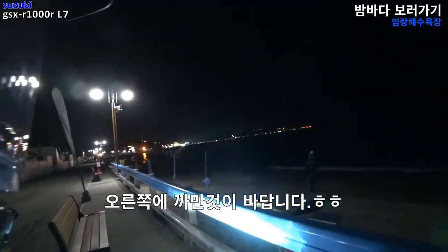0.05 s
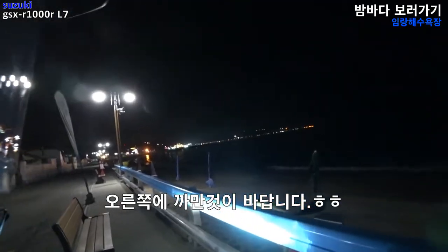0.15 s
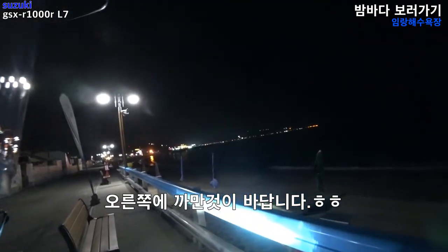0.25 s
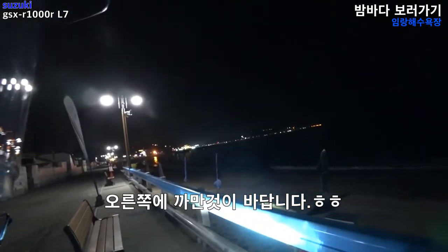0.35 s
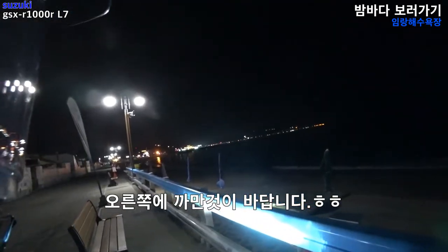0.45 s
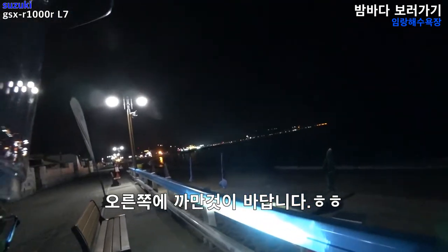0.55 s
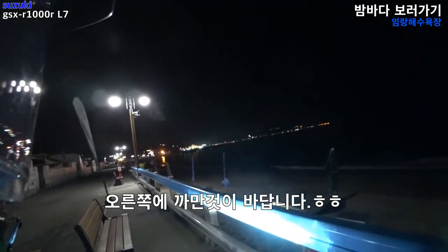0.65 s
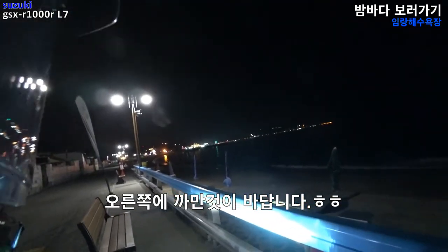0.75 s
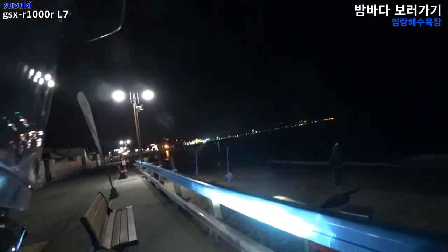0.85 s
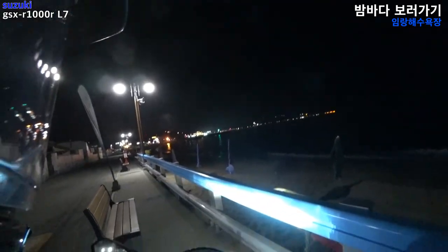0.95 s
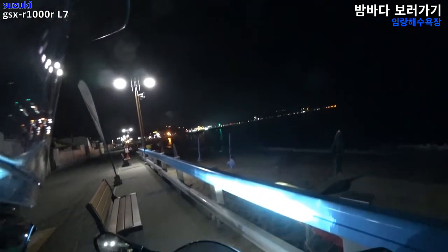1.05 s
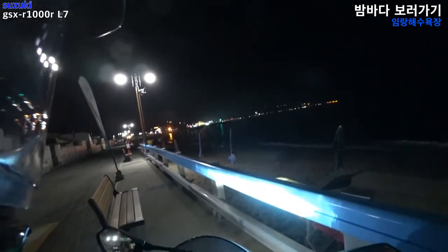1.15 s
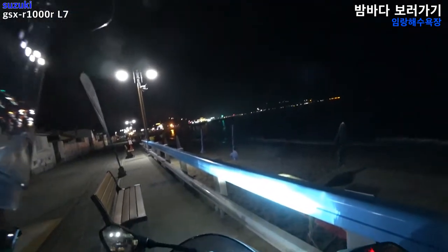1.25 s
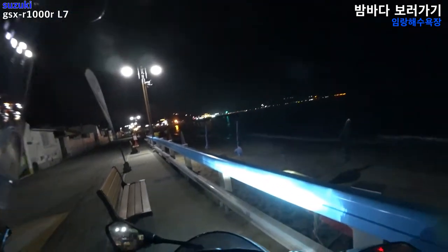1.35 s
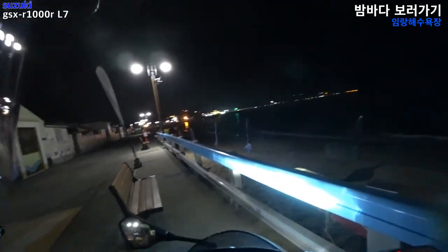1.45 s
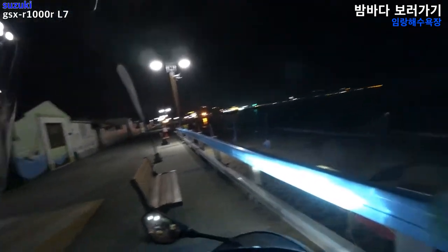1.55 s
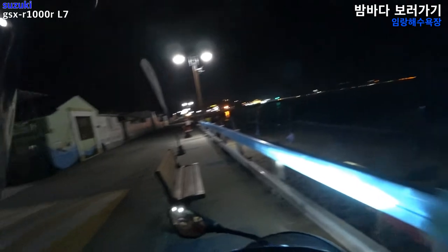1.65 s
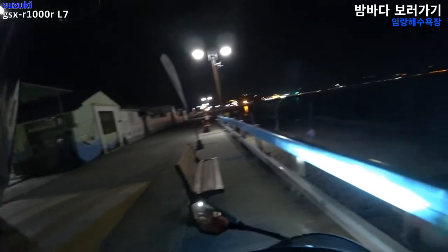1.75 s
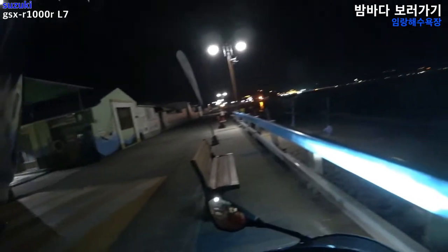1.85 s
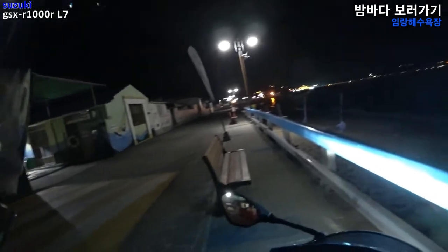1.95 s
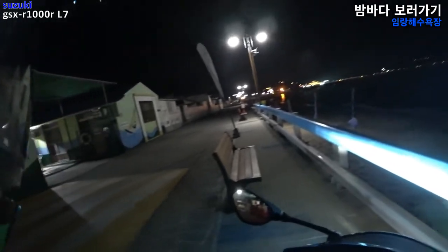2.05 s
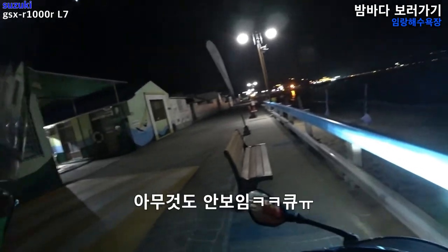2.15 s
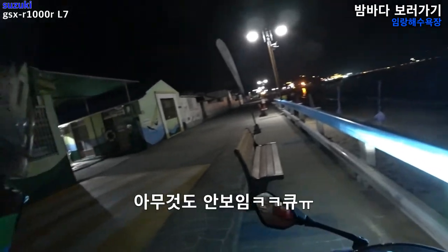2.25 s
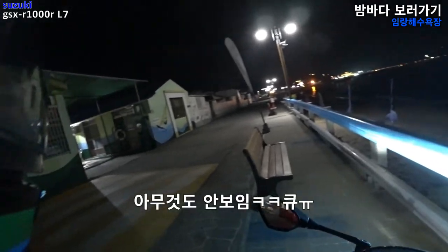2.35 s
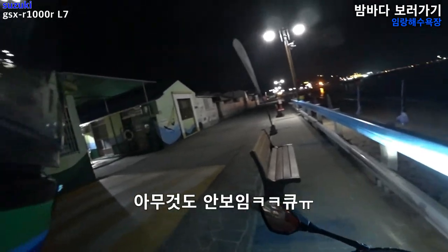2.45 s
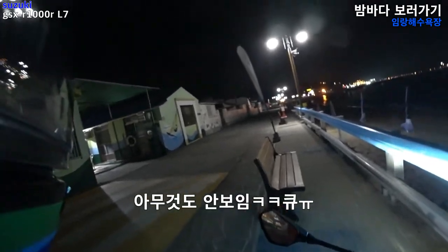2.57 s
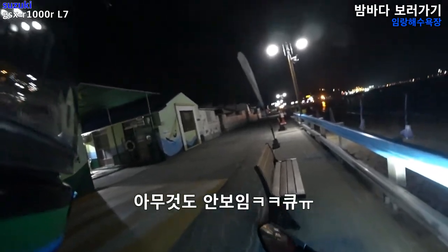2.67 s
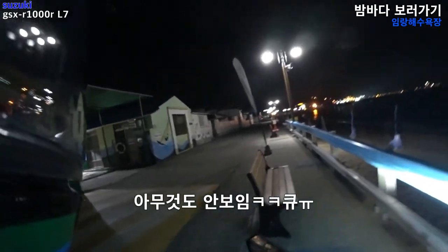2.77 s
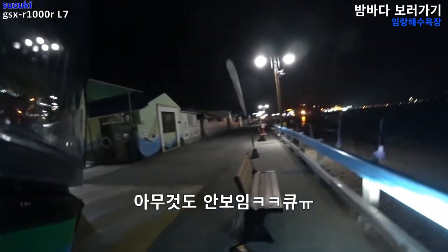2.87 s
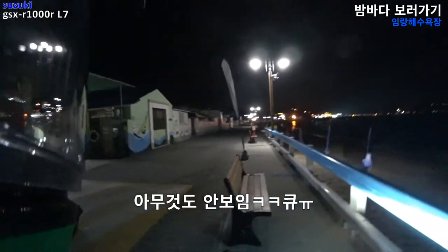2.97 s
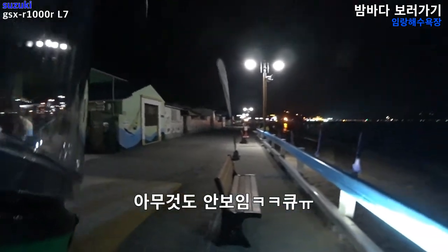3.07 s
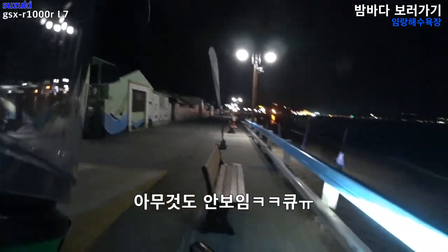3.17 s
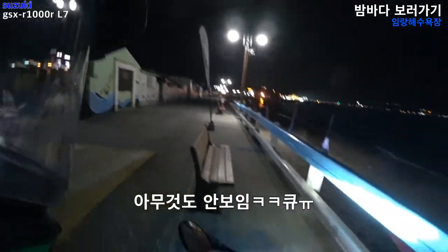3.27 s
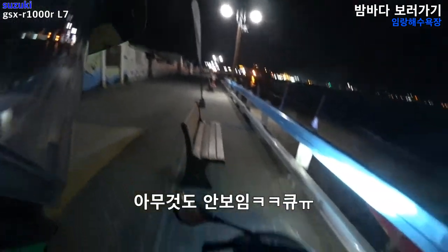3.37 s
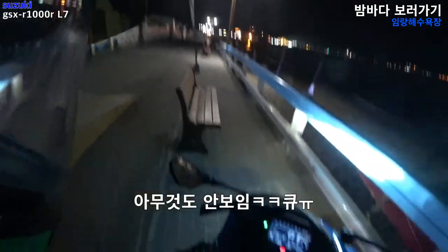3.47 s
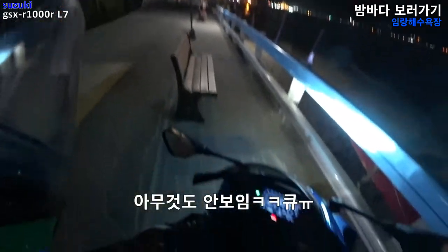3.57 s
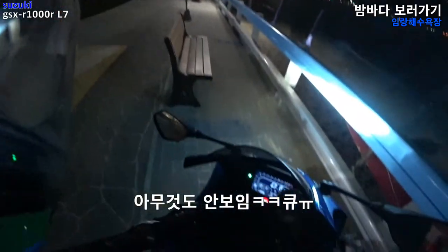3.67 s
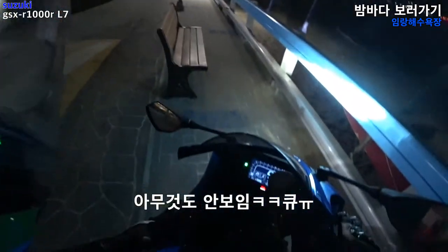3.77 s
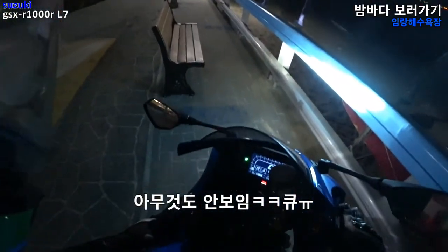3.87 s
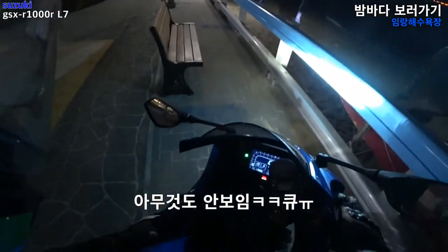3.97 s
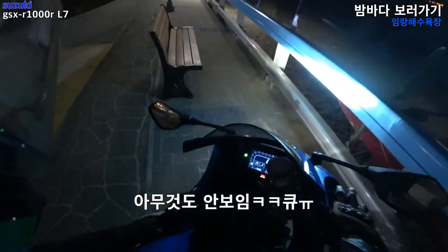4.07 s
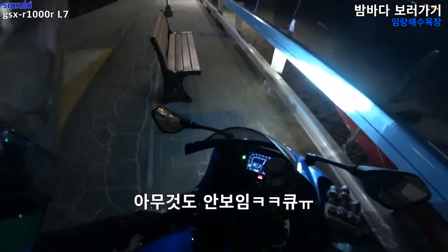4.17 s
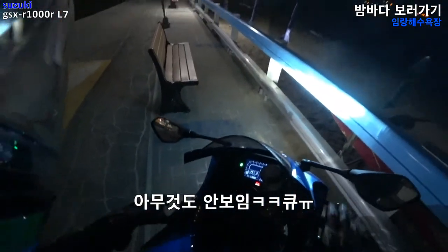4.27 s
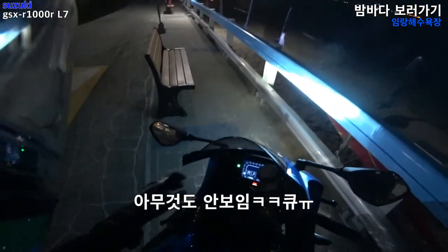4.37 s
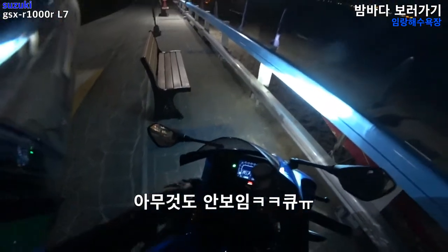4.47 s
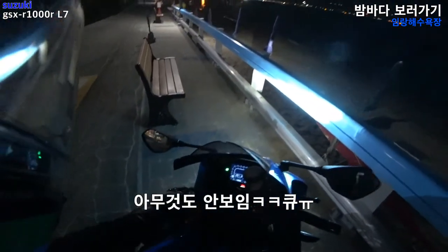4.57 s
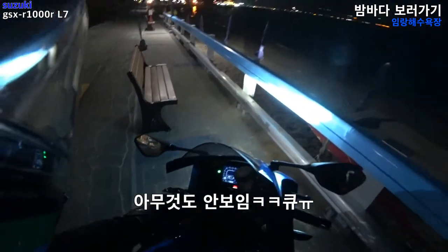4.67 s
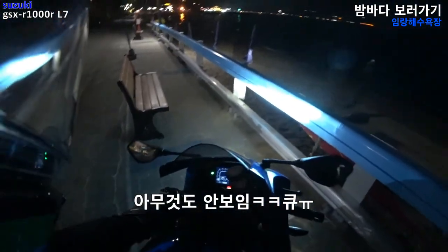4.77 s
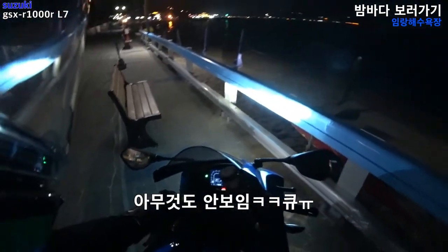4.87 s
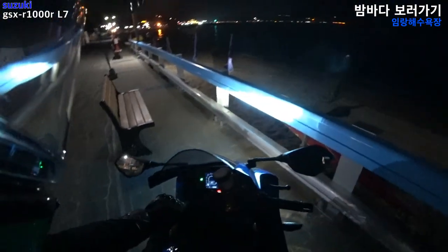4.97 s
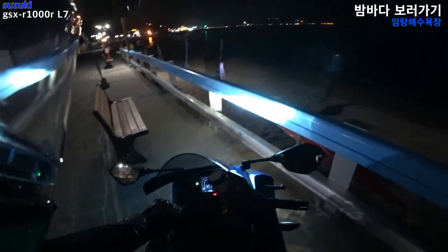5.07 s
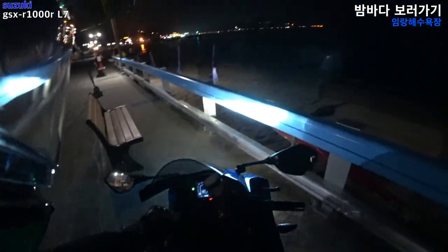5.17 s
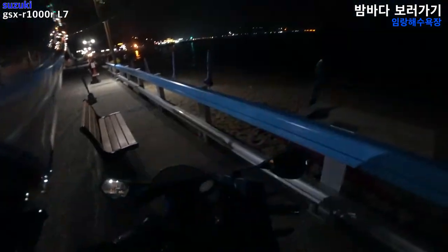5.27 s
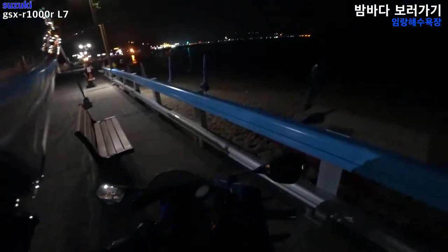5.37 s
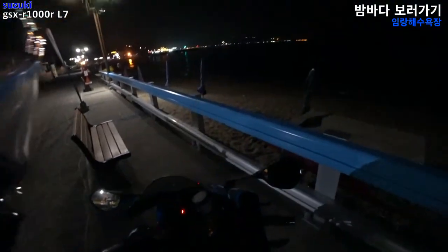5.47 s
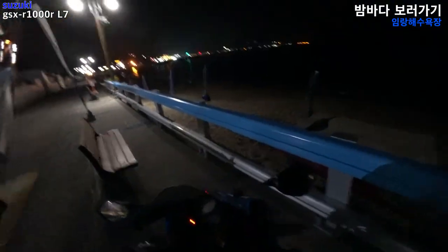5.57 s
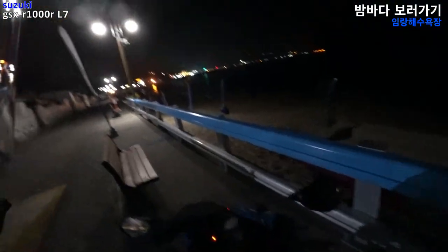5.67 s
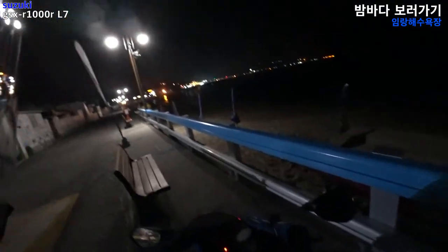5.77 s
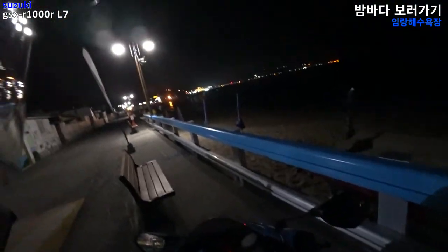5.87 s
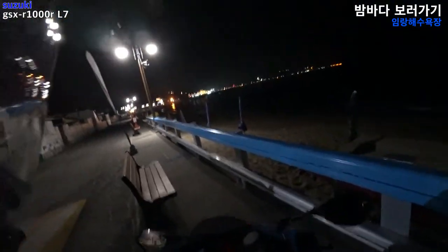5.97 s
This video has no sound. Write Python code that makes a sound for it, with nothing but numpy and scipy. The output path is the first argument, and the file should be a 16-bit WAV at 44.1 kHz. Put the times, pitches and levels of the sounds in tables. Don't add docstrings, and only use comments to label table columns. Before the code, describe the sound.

A motorcycle is already idling at 0 s, heard close from a helmet on an open seafront. Some forty soft, deep exhaust barks per second merge into a throbbing, boomy purr that wavers slightly, stumbling notably around 1.4 s. Low gas flutter, valve rattle, thin gear whine and faint casing knocks sit around it, with a light fan hiss that stops at about 1 s. Harder firings crack through near 1.1, 2.3, 2.8 and 4.4 s. As the head turns from about 3 s, the bark becomes edgier and more ringing; between 4.9 and 5.3 s the firings hit harder. At roughly 5.3 s the engine is switched off: four slowing gulps and thuds, then clacks around 5.5 s. Automatic gain rises, lifting hollow, rumbling surf wash, with low bumps at 5.6-5.7 s and a dull knock near 5.9 s.

```python
import sys
import numpy as np
from scipy import signal
from scipy.fft import rfft, irfft
from scipy.io import wavfile
from scipy.ndimage import uniform_filter1d

SR = 44100
rng = np.random.default_rng(int(sys.argv[2]) if len(sys.argv) > 2 else 0)


def put_to_file(sound):
    columns = np.atleast_2d(sound).T
    safe = np.clip(columns, -1, 1)
    whole_steps = np.round(safe * 32767)
    wavfile.write(sys.argv[1], SR, whole_steps.astype(np.int16))


def level_to_linear(level):
    exponent = np.asarray(level, float) / 20
    return 10 ** exponent


N = 265923
T = np.arange(N) / SR
HZ = np.arange(N // 2 + 1) * SR / N + 1e-3

IDLE_HZ, FIRST_TURN = 42.31, 0.8718
# t/s, change of firing rate f/Hz, half length t/s
STUMBLES = [(0.111, -2.57, 0.066), (0.424, 1.52, 0.074), (0.541, -2.14, 0.131), (0.716, 1.64, 0.043),
            (0.92, -0.91, 0.126), (1.216, -1.78, 0.037), (1.371, -4.82, 0.063), (1.507, 1.01, 0.025),
            (1.734, -1.18, 0.07), (2.023, -2.35, 0.046), (2.167, -2.81, 0.046), (2.54, -2.98, 0.062),
            (2.91, -1.8, 0.042), (3.078, -2.81, 0.054), (3.288, -1.3, 0.068), (3.611, -1.17, 0.061),
            (3.766, -2.23, 0.034), (3.951, -2.72, 0.061), (4.431, 3.72, 0.05), (4.449, -2.17, 0.196),
            (4.88, -2.63, 0.177), (4.952, 3.08, 0.061), (5.092, -1.79, 0.025), (5.199, 1.16, 0.042)]
CYLINDER_LATE_TURNS = [0, .003, .009, .012]
CYLINDER_DB = [0.049, -0.71, -0.46, .4]
# t/s, bark level/dB, silencer ring level/dB, edge level/dB
HEAD = [(0, -0.1, 1.6, -8), (.9, -0.2, 1.3, -4.5), (1.2, 0.4, 1.5, -6.3), (2.0, -0.5, 1, -1.1),
        (2.6, 0.2, 2, -2), (3.2, -2, 5.5, 0.6), (3.7, -2.5, -0.5, 3.5), (4.5, -1.95, 6, 1.2),
        (4.85, -0.4, 6.5, -1.5), (5.0, -0.7, 7, -1.5), (5.2, 0.9, 5.5, -3), (5.32, 0.1, 7, -2.5)]
BARK_DB_PER_HZ, CAN_DB_PER_HZ, BOOM_DB_PER_HZ, EDGE_DB_PER_HZ = -0.02, 0.5, -0.1, 1
PUSH_HZ, PUSH_LEAD_S = 200, 5.5e-4
SILENCER_HZ, SILENCER_Q, VENT_HZ = 360, 1.3, 130
TRAP_HZ, TRAP_Q, TRAP_SHARE = 164, 2.4, 0.34
CAN_HZ, CAN_Q, CAN_PER_DB = 231, 5.3, 0.1471
EDGE_HZ, EDGE_Q = 367, 1.1
BOX_HZ, BOX_Q, BOOM_DB = 41.6, 5.0, 0
# t/s, suction level/dB, boom level/dB
COAST = [
    (5.347, -9, 3),
    (5.374, -4.5, -17),
    (5.41, -4.5, 4),
    (5.454, -6, 0),
]
# f/Hz, level/dB per Hz
RATTLE_TONE = [(250, -18), (420, -4.5), (482, 1), (545, -9), (822, -21), (969, -15.5), (1220, -21.5),
               (1700, -21), (1900, -32.5), (2780, -26.5), (3230, -36), (3710, -33.5), (7880, -50),
               (10500, -38.5), (11100, -45), (14400, -85), (22000, -120)]
RATTLE_DB, FLUTTER_DB = -38.5, -28
# f/Hz, level/dB rms
WHINE = [(552, -66.5), (2148, -79), (2558, -71.5)]
# t/s, level/dB
CASING_LEVEL = [(0, -46), (.9, -45), (1.5, -46.5), (1.7, -60.5), (3.4, -50.5), (3.6, -67.5), (5.3, -47.5),
                (5.6, -60.5)]
# f/Hz, Q, level/dB
CASING_MODES = [(495, 4, -1.5), (744, 11, 1.5), (986, 6.8, 3.5), (1423, 5.4, -3), (1625, 16, 1),
                (2460, 24, -23), (3710, 16, -26)]
# f/Hz, level/dB per Hz
FAN_TONE = [(1500, -22.5), (2600, -7), (4000, -13), (6500, 1), (8500, -2), (11000, -1.5)]
FAN_DB, FAN_OFF_S, FAN_FADE_DB_PER_S = -56, 1.01, 169
# f/Hz, level/dB per Hz
SURF_TONE = [(18, -46.5), (35, -17.5), (70, 1.5), (95, -8.5), (161, 0.5), (202, -4.5), (265, 0.5),
             (516, -7), (600, -8.5), (660, -12.5), (1290, -21), (2500, -24), (4340, -38), (6280, -35),
             (11100, -41.5)]
# f/Hz, Q, level/dB
HELMET = [(340, 3.4, -17), (492, 14, -5.5), (583, 26, -3), (1576, 3.8, -5)]
SURF_DB, RECOVER_DB_PER_S, RELEASE_S = -39, 50, 5.337
PAUSE_S, PAUSE_LENGTH_S, CEILING_DB = 5.548, 0.12, -17
# t/s, peak level/dB, half length t/s
HARD_FIRINGS = [(0.153, -35, .009), (0.728, -40.5, .009), (1.063, -26, .009), (2.18, -37, 0.01),
                (2.303, -20.5, .009), (2.781, -22, 0.011), (3.73, -32, .009), (3.922, -36, .009),
                (4.428, -21, 0.011), (4.919, -22.5, .03), (5.002, -19.5, 0.05), (5.18, -19.5, .04),
                (5.266, -21.5, 0.07)]
CRACK_HZ, CRACK_Q = 588, 1.4
# t/s, peak level/dB, length t/s, centre f/Hz, spread factor
CLACKS = [(5.483, -28, 0.016, 2600, 3.2), (5.484, -24.5, 0.016, 1400, 1.6), (5.56, -26.5, 0.051, 35, 1.4),
          (5.63, -28, 0.078, 45, 1.9), (5.72, -22.5, 0.13, 68, 1.3), (5.923, -16.5, 0.037, 520, 1.2),
          (5.499, -14, 0.0029, 250, 0.93), (5.512, -19.5, 0.065, 280, 1.4), (5.52, -34.5, 0.06, 1500, 0.96),
          (5.343, -43.5, .002, 5000, 2.5), (2.74, -40.5, 0.006, 7200, 1.2), (2.8, -46, 0.0073, 3400, 1.1),
          (3.43, -47.5, 0.012, 5000, 0.79)]
# f/Hz, correlation
LIKENESS = [(60, 1.0), (130, 0.96), (270, 1.0), (570, 0.96), (1210, 0.93), (2560, -0.59), (5420, -0.44),
            (11500, 0.28)]
# f/Hz, left minus right level/dB
LEAN = [(60, .7), (190, .9), (350, 1.1), (620, 2.2), (1110, 4.3), (1990, 5), (3570, -.3), (6410, -1),
        (11500, -6.5)]
PORT_LAG_S, KNEE, HEADROOM, TOP_HZ = 6e-5, 0.78, 0.17, 11100


def level(x, db):
    return x * level_to_linear(db) / np.sqrt(np.mean(x ** 2))


def curve(table, column=1):
    return np.interp(T, np.array(table)[:, 0], np.array(table)[:, column])


def on_log(table, hz):
    return np.interp(np.log(hz), np.log(np.array(table)[:, 0]), np.array(table)[:, 1])


def hump(s, half_s):
    return np.exp(-((T - s) / half_s) ** 2)


def ring(hz, q):
    return 1 / (1 - (HZ / hz) ** 2 + 1j * HZ / hz / q)


def band(hz, q):
    return ring(hz, q) * 1j * HZ / hz / q


def low_cut(hz):
    return HZ ** 2 / (HZ ** 2 + hz ** 2)


def walk(rate):
    k = int(SR / rate)
    held = np.repeat(rng.standard_normal(N // k + 1), k)
    return 0.74 * uniform_filter1d(uniform_filter1d(held, k), k)[:N]


def diffuse(tone, flicker_db, rate):
    like = np.clip(on_log(LIKENESS, HZ), -0.9, 0.999)
    colour = level_to_linear(on_log(tone, HZ))
    mid = rfft(rng.standard_normal(N)) * colour * np.sqrt(1 + like)
    side = rfft(rng.standard_normal(N)) * colour * np.sqrt(1 - like)
    ports = np.array([mid + side, mid - side])
    out = 0
    for place in np.arange(9, 28):
        slot = np.cos(np.clip(2 * np.log2(HZ) - place, -1, 1) * np.pi / 2) ** 2
        out = out + level_to_linear(flicker_db * walk(rate)) * irfft(slot * ports, N)
    return level(out, 0)


def strokes(times, sizes):
    train = np.zeros(N)
    np.add.at(train, (np.asarray(times) * SR).astype(int), sizes)
    return rfft(train)


def crank():
    surge_hz = sum(hz * hump(s, half_s) for s, hz, half_s in STUMBLES)
    turns = np.cumsum(IDLE_HZ + surge_hz) / SR - FIRST_TURN
    firing_points = np.arange(221) + np.resize(CYLINDER_LATE_TURNS, 221)
    fired = np.interp(firing_points, turns, T)
    return turns, fired, np.interp(fired, T, surge_hz)


def exhaust_bark(fired, surge):
    bark_db, can_db, edge_db = (curve(HEAD, column=k)[(fired * SR).astype(int)] for k in (1, 2, 3))
    late, loud, ringing = rng.standard_normal((3, len(fired)))
    bark_db = bark_db + BARK_DB_PER_HZ * surge + np.resize(CYLINDER_DB, len(fired))
    can_db = can_db + CAN_DB_PER_HZ * surge
    edge_db = edge_db + EDGE_DB_PER_HZ * surge
    size = level_to_linear(bark_db + 0.32 * loud)
    at = fired + 0.00014 * late
    barks = strokes(at, size) + strokes(at, size * (level_to_linear(edge_db) - 1)) * band(EDGE_HZ, EDGE_Q)
    rings = strokes(at, size * CAN_PER_DB * (can_db + 0.27 * ringing)) * band(CAN_HZ, CAN_Q)
    push = np.exp(-(HZ / PUSH_HZ) ** 2 + 2j * np.pi * HZ * PUSH_LEAD_S)
    pipe = ring(SILENCER_HZ, SILENCER_Q) * low_cut(VENT_HZ) - TRAP_SHARE * band(TRAP_HZ, TRAP_Q)
    return irfft((barks + rings) * push * pipe, N) * level_to_linear(48.0)


def air_box_boom(fired, surge):
    coast_s, _, thud_db = np.transpose(COAST)
    boom_db = BOOM_DB + BOOM_DB_PER_HZ * surge + 0.5 * rng.standard_normal(len(fired))
    booms = strokes(fired, level_to_linear(boom_db)) + strokes(coast_s, level_to_linear(thud_db))
    booms = booms + level_to_linear(6.5)
    box = ring(BOX_HZ, BOX_Q) * np.exp(-(HZ / 120) ** 2) * low_cut(24.0)
    return -irfft(booms * box, N) * level_to_linear(30.5)


def gas_flutter(turns):
    tone = ring(331.0, 1.0) ** 2 * np.exp(-(HZ / 330) ** 4) * low_cut(45)
    noise = irfft(rfft(rng.standard_normal(N)) * tone, N)
    return level(noise * level_to_linear(1.8 * np.cos(2 * np.pi * (turns - 0.12))), FLUTTER_DB)


def valve_rattle(turns):
    beat = level_to_linear(2.7 * np.cos(2 * np.pi * (turns - 0.08)) + 0.63 * np.cos(6 * np.pi * turns))
    return diffuse(RATTLE_TONE, flicker_db=-0.5, rate=22.0) * beat * level_to_linear(RATTLE_DB)


def gear_whine():
    wander = np.cumsum(1 + 0.003 * walk(6.0)) / SR
    return sum(np.sqrt(2) * level_to_linear(db) * np.sin(2 * np.pi * hz * wander) for hz, db in WHINE)


def casing():
    knocks = diffuse([(200, 0.0088), (11000, 0.016)], flicker_db=5.5, rate=16.0)
    modes = sum(level_to_linear(db) * band(hz, q) ** 2 for hz, q, db in CASING_MODES)
    return level(irfft(rfft(knocks) * modes, N), 0) * level_to_linear(curve(CASING_LEVEL))


def fan():
    fade_db = FAN_FADE_DB_PER_S * np.clip(T - FAN_OFF_S, 0, None)
    return diffuse(FAN_TONE, flicker_db=4.0, rate=28.0) * level_to_linear(FAN_DB - fade_db)


def recovery():
    climbing_s = np.clip(T - RELEASE_S, 0, None) - np.clip(T - PAUSE_S, 0, PAUSE_LENGTH_S)
    return level_to_linear(np.minimum(SURF_DB + RECOVER_DB_PER_S * climbing_s, CEILING_DB))


def surf():
    waves = diffuse(SURF_TONE, flicker_db=3.5, rate=26.0)
    hollow = 1 + sum(level_to_linear(db) * band(hz, q) for hz, q, db in HELMET)
    return irfft(rfft(waves) * hollow, N) * recovery()


def hard_crack(fired):
    size = sum(level_to_linear(db) * np.exp(-((fired - s) / half_s) ** 4) for s, db, half_s in HARD_FIRINGS)
    fronts = strokes(fired - PUSH_LEAD_S / 2, size)
    return irfft(fronts * 1j * np.abs(band(CRACK_HZ, CRACK_Q)) ** 2, N) * level_to_linear(32.5)


def clacks():
    out = np.zeros((2, N))
    age = np.arange(4400) / SR
    for s, db, length, hz, spread in CLACKS:
        ratio = max(spread, 1.05)
        sos = signal.butter(2, [hz / ratio, hz * ratio], "band", fs=SR, output="sos")
        envelope = np.exp(-(age / length) ** 2) * np.minimum(age * hz, 1)
        mid, side = signal.sosfilt(sos, rng.standard_normal((2, len(age)))) * envelope
        burst = mid + min(hz / 2500, 1) * side * np.array([[1], [-1]])
        start = int(s * SR)
        out[:, start:start + len(age)] += level_to_linear(db) * burst / np.abs(burst).max()
    return out


def coasting_suction():
    coast_s, suck_db, _ = np.transpose(COAST)
    gulp = np.exp(-(HZ / 210) ** 2) * band(94.0, 0.75)
    return -irfft(strokes(coast_s, level_to_linear(suck_db)) * gulp, N) * level_to_linear(39.5)


def scene():
    turns, fired, surge = crank()
    pulses = exhaust_bark(fired, surge) + air_box_boom(fired, surge)
    pulses = pulses + hard_crack(fired) + coasting_suction()
    running = np.clip((5.5 - T) / 0.062, 0, 1)
    cycle = running * (gas_flutter(turns) + valve_rattle(turns) + gear_whine())
    return pulses + cycle + casing() + fan() + surf() + clacks()


def roll_off(x):
    return signal.sosfilt(signal.butter(12, 11200, fs=SR, output="sos"), x)


def record(dry):
    tilt = level_to_linear(on_log(LEAN, HZ) / 2) * np.exp(-1j * np.pi * HZ * PORT_LAG_S)
    x = irfft(rfft(dry) * np.array([tilt, 1 / tilt]), N)
    over = np.maximum(np.abs(x) - KNEE, 0)
    x = x - np.sign(x) * (over - HEADROOM * np.tanh(over / HEADROOM))
    x = irfft(rfft(x) * (HZ < TOP_HZ), N)
    return roll_off(x)


dry = scene()
out = record(dry)
put_to_file(out)
```